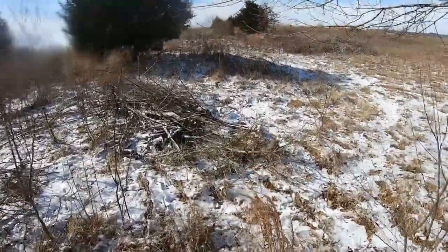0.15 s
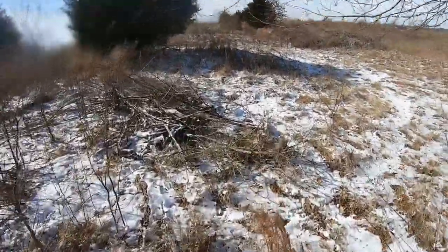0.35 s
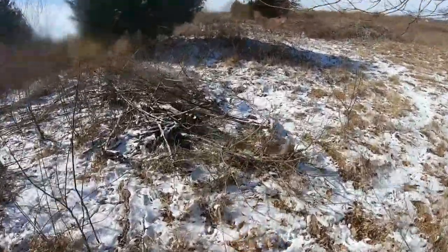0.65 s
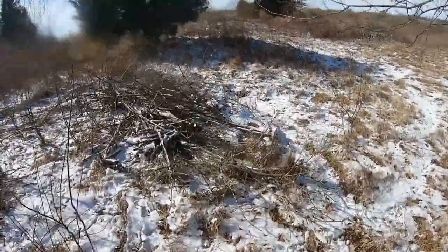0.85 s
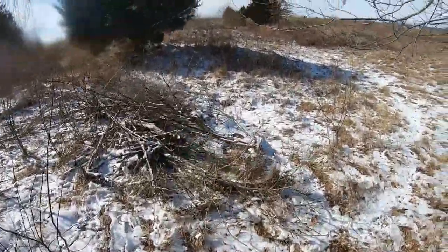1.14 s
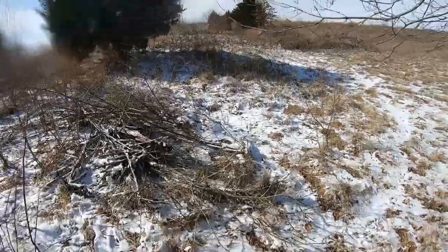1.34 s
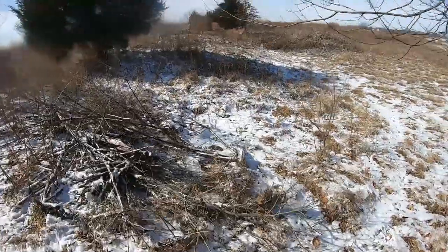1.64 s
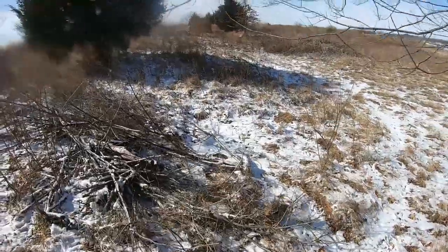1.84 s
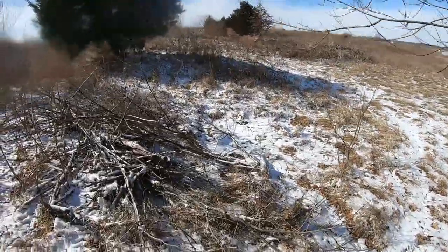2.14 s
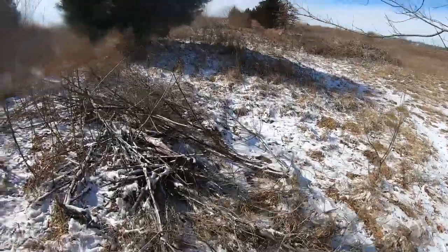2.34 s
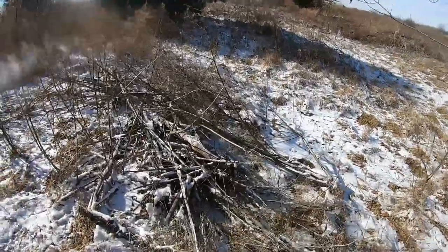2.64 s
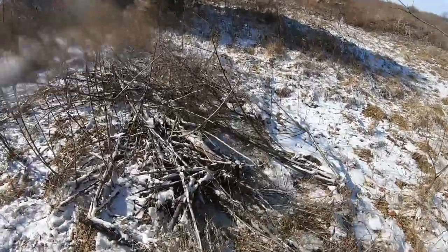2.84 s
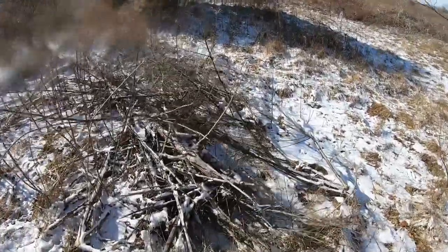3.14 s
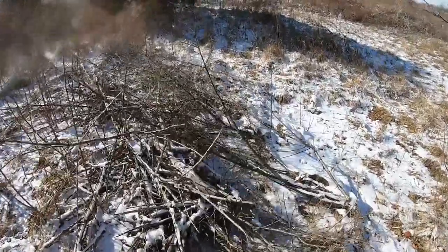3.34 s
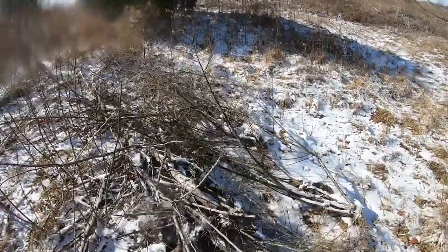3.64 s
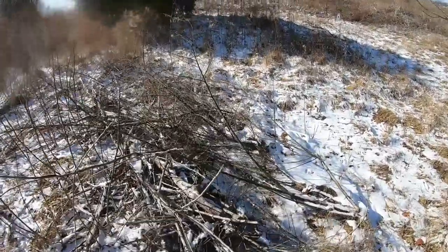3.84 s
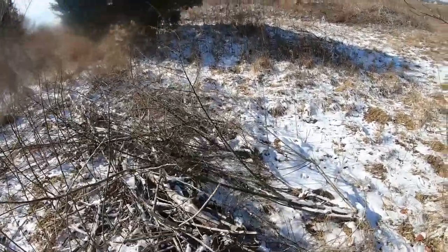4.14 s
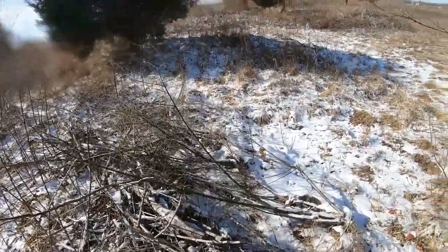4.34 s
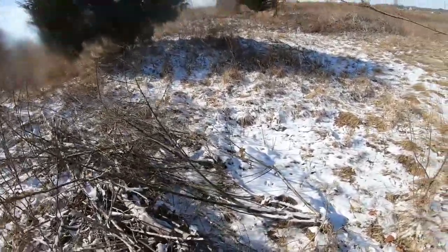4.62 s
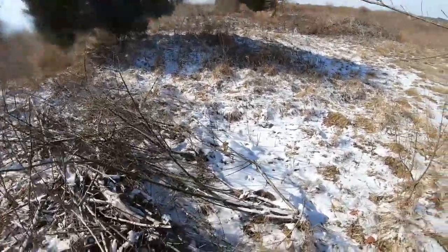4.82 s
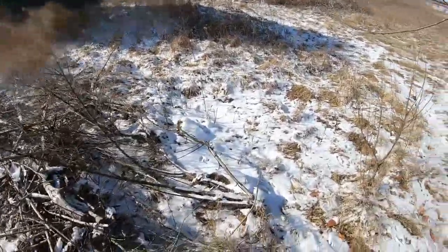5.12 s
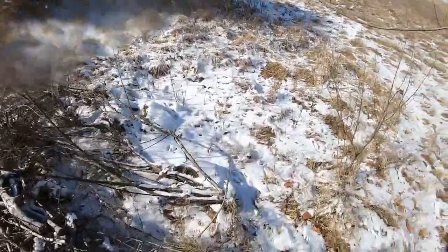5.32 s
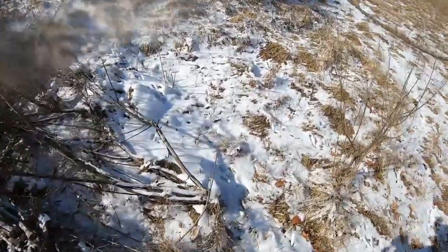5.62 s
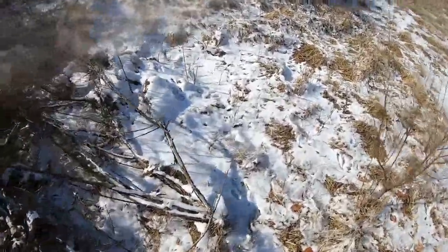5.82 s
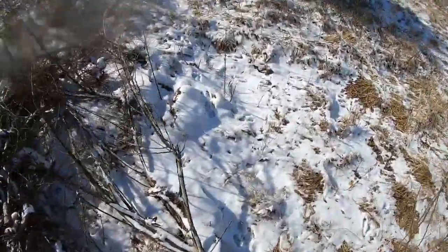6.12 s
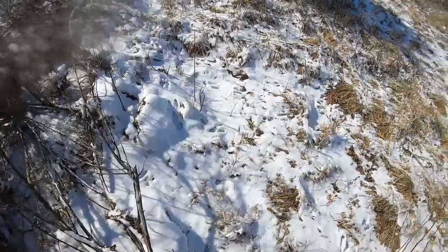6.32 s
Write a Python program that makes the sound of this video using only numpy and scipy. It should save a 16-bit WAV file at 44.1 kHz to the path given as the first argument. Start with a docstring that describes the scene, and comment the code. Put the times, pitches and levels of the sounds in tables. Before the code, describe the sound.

Dry brush crackles and scrapes around a walker's legs as frozen snow gives way underfoot in lumpy crunches with dull thuds. Sharp twigs break throughout, loudest at about three and a half seconds. After a near pause, a faint squeak and heavy low wind buffets come in, then busy crunching and snapping continue. Outdoor, dry, no echo, heard from a small body-worn camera, early stereo width soon collapsing to the middle.

```python
"""Boots crush crusted snow and push through dry brush in an open field: lumpy and fine crackling noise.
Twigs snap as sharp pulses with decaying noise, thin tips tick, and stems squeak as gliding tones.
Wind buffets the two ports of a small camera as lumpy low noise, over a faint rush of the far field.
The wide stereo picture soon folds into the middle."""
import sys
import numpy as np
from scipy import signal
from scipy.fft import rfft, irfft, next_fast_len
from scipy.io import wavfile
from scipy.ndimage import uniform_filter1d, map_coordinates

SR = 44100
rng = np.random.default_rng(int(sys.argv[2]) if len(sys.argv) > 2 else 0)


def int16_out(signal):
    """Quantize to a 16-bit WAV file."""
    q = np.round(np.clip(np.atleast_2d(signal).T, -1, 1) * 32767)
    wavfile.write(sys.argv[1], SR, q.astype(np.int16))


N = 285309
TIME_S = np.arange(N) / SR

# pushes of a boot or leg: start_s, hold_s, stems_db, crust_db
CRUNCHES = [(0.0, 0.12, -32.5, -33.5), (0.142, 0.1, -29.5, -27), (0.256, 0.14, -29.5, -25.5),
            (0.379, 0.2, -31, -27), (0.592, 0.17, -42.5, -31.5), (0.804, 0.1, -33, -30),
            (0.953, 0.029, -39, -31.5), (1.346, 0.075, -33.5, -31.5), (1.515, 0.16, -29.5, -27.5),
            (1.735, 0.3, -31.5, -25), (2.095, 0.077, -25.5, -21.5), (2.204, 0.041, -36.5, -24),
            (2.415, 0.12, -47, -32.5), (3.028, 0.2, -34.5, -30.5), (3.568, 0.05, -17.5, -23.5),
            (3.655, 0.019, -25, -38.5), (3.798, 0.021, -36.5, -37), (4.35, 0.18, -58, -48.5),
            (4.548, 0.14, -36.5, -34), (4.773, 0.089, -33.5, -30), (4.882, 0.076, -33.5, -29),
            (5.02, 0.14, -30.5, -30), (5.229, 0.12, -29, -25.5), (5.53, 0.32, -38, -28),
            (5.717, 0.16, -28.5, -29), (5.943, 0.045, -25.5, -29), (6.046, 0.21, -33.5, -32.5),
            (6.268, 0.4, -36, -30)]
ATTACK_SHARE, SAG_DB_PER_S, RELEASE_DB_PER_S = 0.23, 9, 263
SETTLE_DB, SETTLE_DB_PER_S = -11, 70  # loose crumbs and stems settle after a push


def pushes(levels_db):
    """Each push swells over part of its hold, sags, lets go fast and settles slowly; powers add."""
    t = np.arange(SR // 2) / SR
    power = np.zeros(N + SR)
    for (start_s, hold_s, *_), level_db in zip(CRUNCHES, levels_db):
        after_s = np.maximum(t - hold_s, 0)
        release = amp(-2 * RELEASE_DB_PER_S * after_s)
        settling = amp(2 * (SETTLE_DB - SETTLE_DB_PER_S * after_s))
        attack = np.minimum(t / (ATTACK_SHARE * hold_s), 1)
        swell = amp(level_db - SAG_DB_PER_S * np.minimum(t, hold_s)) * attack
        power[round(start_s * SR):][:len(t)] += swell ** 2 * (release + settling)
    return np.sqrt(power[:N])


# breaking twigs and crust: start_s, stems_db, thud_db, t60_s
SNAPS = [(0.043, -15, -24, 0.024), (0.275, -23, -54, 0.14), (.3, -29, -11, 0.015), (0.335, -23, -44, 0.098),
         (0.436, -20, -25, 0.026), (0.4666, -20.5, -54, 0.032), (0.5806, -14.5, -35, 0.0072),
         (0.6524, -14.5, -10, 0.0033), (0.761, -16, -18, 0.012), (0.8181, -22, -27, 0.044),
         (1.348, -40, -26, 0.023), (1.363, -43, -11, 0.014), (1.578, -23, -5, 0.027),
         (1.761, -25, -23, 0.04), (1.819, -20, -40, 0.029), (1.853, -66, -14, 0.015),
         (1.883, -50, -9.5, 0.012), (2.069, -40, -19.5, 0.11), (2.088, -40, -14.5, 0.064),
         (2.119, -29, -19, 0.085), (2.162, -33, -18, 0.027), (2.233, -45, -19, 0.033),
         (2.488, -34, -44, 0.04), (2.584, -26.5, -35, 0.024), (2.887, -39, -32.5, 0.082),
         (2.9907, -27, -29.5, 0.051), (3.035, -20, -43, 0.032), (3.0969, -7.5, -20.5, 0.048),
         (3.2159, -5, 3, 0.0062), (3.265, -24.5, -31, 0.038), (3.453, -39, -21, 0.048),
         (3.475, -37, -33, 0.27), (3.5355, -9.5, -14.5, 0.04), (3.5541, -8, -13, 0.052),
         (3.5623, -4.5, -4, 0.012), (3.582, -8, -4, 0.0068), (3.6486, -8, -42, 0.025),
         (4.291, -71, -45, 0.025), (4.467, -32, -30, 0.11), (4.604, -20.5, -39, 0.061),
         (4.655, -27, -37, 0.043), (4.719, -48, -21, 0.016), (5.058, -45, -18.5, 0.044),
         (5.079, -16, -26, 0.019), (5.1873, -22, -31, 0.035), (5.254, -19.5, -12.5, 0.057),
         (5.467, -22, -25.5, 0.085), (5.6105, -13, -24, 0.024), (5.665, -25.5, -40, 0.06),
         (5.9278, -15, -26, 0.051), (5.9716, -6, -14.5, 0.015), (5.98, -10, -20.5, 0.083),
         (6.087, -30, -27.5, 0.04), (6.21, -20.5, -68, 0.067), (6.296, -28, -20, 0.016),
         (6.393, -22, -44, 0.022)]
# slow changes of colour, including the change of the camera's stereo mode near 0.8 s:
# time_s, tips_over_stems_db, deep_over_crust_db, hollow_centre_hz
COLOUR_DRIFT = [(0, 2.5, -2.5, 454), (.75, 3, -2, 475), (.85, -5, -4, 408), (1.3, -12.5, 3.5, 365),
                (2.1, -6.5, 2, 411), (2.9, -13.5, -3.5, 330), (3.7, -12.5, -1, 360), (4.5, -16, 9, 412),
                (5, -13.5, -2.5, 516), (6.47, -10.5, -28, 688)]
# colour of the breaking crust: freq_hz, relative_db
CRUST_COLOUR = [(250, -23), (420, -2.5), (930, -6), (2500, -15), (3300, -49.5)]
# colour of the snow packed below: freq_hz, relative_db
DEEP_COLOUR = [(100, -39), (170, 0.5), (330, -3), (520, -18), (900, -58)]
CRUST_REST_DB = -43.5  # faint stirring between pushes


def crust():
    """Frozen crust gives way in coarse lumps, packs the snow below and thuds under each snap."""
    start_s, _, thud_db, t60_s = np.transpose(SNAPS)
    _, deep_db, hollow_centre_hz = curves(COLOUR_DRIFT)
    lumps = unit(1.0 + crackle(rate_hz=89, spread_db=3.5, t60_s=0.031))
    crush = np.hypot(pushes(np.transpose(CRUNCHES)[3]), amp(CRUST_REST_DB)) * lumps
    thud = snap_envelope(start_s, thud_db, 1.03 * t60_s)

    upper_noise = patchy(ports(0.53, left_db=-14.0), depth_db=2.0)
    upper = coloured((crush + amp(-2) * thud) * upper_noise, CRUST_COLOUR)
    lower_env = amp(deep_db) * (crush + amp(-0.5) * thud)
    lower = coloured(lower_env * ports(1.0, left_db=0.0), DEEP_COLOUR)

    # the hollow under the crust rings unsteadily, at a new random pitch for each snap
    latest = np.maximum(np.searchsorted(start_s, TIME_S) - 1, 0)
    detune = np.exp(rng.normal(0, 0.18, len(start_s)))
    hollow_hz = hollow_centre_hz[np.round(start_s * SR).astype(int)] * detune
    phase = 2 * np.pi * hollow_hz[latest] * (TIME_S - start_s[latest])
    ring = np.sin(phase + 1.2 * wobble(160))
    lowpass = signal.butter(2, 1200, fs=SR, output="sos")
    return upper + lower + amp(9.0) * signal.sosfilt(lowpass, thud * ring)


# colour of the stems as the camera's microphones hear them: freq_hz, relative_db
HEARD_STEMS_COLOUR = [(600, -37), (1200, -4.5), (2200, -3), (3100, 0.5), (4300, -4.5), (5000, -11.5),
                      (5400, -35), (7000, -40.5)]
# colour of the thin tips as the camera's microphones hear them: freq_hz, relative_db
HEARD_TIPS_COLOUR = [(3500, -4), (5500, 0), (7400, 1.5), (10900, -5.5), (12000, -15.5), (14000, -18.5),
                     (16000, -45)]
# thin dry tips flick back: start_s, level_db
TICKS = [(2.3212, -13), (2.832, -35), (3.307, -35), (4.468, -19)]
TICK_T60_S = 0.0075
STEMS_REST_DB = -47.5  # faint stirring between pushes
SNAP_TIPS_DB = -0.5  # snaps shake the tips slightly less than rubbing does
CRACK_DB = 7.5  # one-sample pulse of the break, over the snap's stems level


def brush():
    """Stems rub and break in grains, louder on the right; the same grains drive their bright tips."""
    start_s, stems_db, _, t60_s = np.transpose(SNAPS)
    grains = unit(.9 + crackle(rate_hz=300, spread_db=3, t60_s=0.02))
    rub = np.hypot(pushes(np.transpose(CRUNCHES)[2]) * grains, amp(STEMS_REST_DB))
    snaps = snap_envelope(start_s, stems_db, t60_s)
    crack = np.bincount(np.round(start_s * SR).astype(int), amp(stems_db + CRACK_DB), N)
    crack = crack * amp([[-4], [4]])  # left, right

    stem_noise = patchy(ports(0.28, left_db=-5.5), depth_db=2.0)
    stems = coloured(crack + (rub + snaps) * stem_noise, HEARD_STEMS_COLOUR)

    ticks = snap_envelope(*np.transpose(TICKS), TICK_T60_S)
    tips_env = amp(curves(COLOUR_DRIFT)[0]) * (rub + amp(SNAP_TIPS_DB) * snaps) + ticks
    tip_noise = patchy(ports(-0.52, left_db=-4.5), depth_db=3.0)
    return stems + coloured(tips_env * tip_noise, HEARD_TIPS_COLOUR)


# a stem slides on cloth: start_s, length_s, from_hz, to_hz, level_db (before flutter)
SQUEAKS = [(4.48, 0.079, 974, 1210, -33.5), (6.252, 0.057, 5350, 4800, -39)]


def squeaks():
    """Stick and slip of a sliding stem: a gliding tone with random phase and level flutter."""
    out = np.zeros(N)
    flutter = amp(4 * wobble(150))
    for start_s, length_s, from_hz, to_hz, level_db in SQUEAKS:
        u = np.linspace(0, 1, round(length_s * SR))
        phase = 2 * np.pi * np.cumsum(from_hz + (to_hz - from_hz) * u ** 2) / SR
        tone = np.sin(phase + 2 * wobble(318)[:len(u)])
        fade = np.sqrt(np.sin(np.pi * u).clip(0))
        out[round(start_s * SR):][:len(u)] += amp(level_db) * fade * tone
    return out * flutter


# wind buffets: time_s, level_db
WIND = [(0.0, -33.5), (0.45, -26), (0.5, -16.5), (1.22, -39), (2.18, -21), (2.41, -41.5), (2.62, -33),
        (2.96, -29), (3.5, -27), (3.71, -44.5), (3.98, -28.5), (4.16, -51), (4.32, -21.5), (4.48, -38),
        (4.51, -8.5), (5.17, -27.5), (5.35, -8.5), (5.4, -21), (5.93, -13), (5.98, -22)]
# balance of the buffets: time_s, left_over_right_db
WIND_SIDE = [(0, -1), (.38, -8), (.5, 16)]
# colour of the buffets: freq_hz, relative_db
RUMBLE_COLOUR = [(15, 3), (42, 6.5), (169, -1.5), (291, -15), (600, -24.5), (1300, -89)]
# colour of the far field: freq_hz, relative_db
FIELD_COLOUR = [(40, 0), (150, -15), (300, 5), (1000, -6), (4300, -7), (5300, -35), (11000, -14.5),
                (16000, -56)]


def wind():
    """Eddies buffet the ports in lumps, as nearly unrelated noises; the far field rushes faintly."""
    lumps = unit(amp(4 * wobble(22)))
    swell = amp(2.5 * wobble(4))
    rumble = coloured(ports(0.043, left_db=curves(WIND_SIDE)[0]), RUMBLE_COLOUR)
    buffet = amp(curves(WIND)[0]) * lumps * rumble
    return buffet + amp(-51.5) * swell * coloured(ports(0.3, left_db=6), FIELD_COLOUR)


def snap_envelope(starts_s, levels_db, t60s_s):
    """Sum of sudden starts, each with its own exponential decay."""
    t = np.arange(SR // 4) / SR
    rise = 1 - np.exp(-t / 0.00075)
    env = np.zeros(N + SR)
    for start_s, level_db, t60_s in np.broadcast(starts_s, levels_db, t60s_s):
        env[round(start_s * SR):][:len(t)] += amp(level_db - 60 * t / t60_s) * rise
    return env[:N]


def crackle(rate_hz, spread_db, t60_s):
    """Envelope, at rms 1, of small breaks at random moments with exponentially spread dB sizes."""
    chance, size = rng.random((2, N))
    size_db = np.minimum(-spread_db * np.log(1 - size), 3 * spread_db)
    kicks = (chance < rate_hz / SR) * amp(size_db)
    return unit(np.sqrt(dying(kicks ** 2, t60_s / 2)))  # half the t60, as this is power


def dying(kicks, t60_s):
    """Each kick starts at once and decays exponentially."""
    return signal.lfilter([1], [1, -amp(-60 / (t60_s * SR))], kicks)


def patchy(pair, depth_db):
    """Random gain in small patches of time and frequency, the same at both ports."""
    z = signal.stft(pair, nperseg=512)[2]
    field = uniform_filter1d(rng.standard_normal(z.shape[1:]), size=3, axis=0)
    field = uniform_filter1d(field, size=3, axis=1)
    gain = unit(amp(depth_db * unit(field)))
    return signal.istft(z * gain, nperseg=512)[1][:, :N]


def ports(alike, left_db):
    """Noise at two ports with correlation alike and left-over-right left_db; their mean has rms 1."""
    shared, other = rng.standard_normal((2, N))
    left = amp(left_db / 2) * (alike * shared + np.sqrt(1 - alike ** 2) * other)
    right = amp(-left_db / 2) * shared
    return np.array([left, right]) / np.std((left + right) / 2)


def coloured(x, spectrum):
    """Filter x by a colour at unit energy, so white noise keeps its power."""
    pulse = pulse_of(spectrum)
    pulse = pulse / np.linalg.norm(pulse)
    return signal.fftconvolve(x, pulse[None], axes=1)[:, :N]


def pulse_of(spectrum):
    """Minimum-phase pulse of a colour, by folding its cepstrum."""
    size = 4096
    freq_hz, db = np.transpose(spectrum)
    bins_hz = np.fft.rfftfreq(size, 1 / SR)
    gain = amp(np.interp(np.log(bins_hz + 1), np.log(freq_hz + 1), db, left=-70))
    ceps = irfft(np.log(gain + 1e-6))
    ceps[1:size // 2] *= 2
    ceps[size // 2 + 1:] = 0
    return irfft(np.exp(rfft(ceps)))


def wobble(rate_hz):
    """Smooth random curve with rate_hz knots a second."""
    knots = rng.standard_normal(int(N * rate_hz / SR) + 4)
    return map_coordinates(knots, [np.arange(N) * rate_hz / SR])


def curves(rows):
    """One value per sample for each column after the time."""
    time_s, *columns = np.transpose(rows)
    return [np.interp(TIME_S, time_s, column) for column in columns]


def amp(db):
    """Gain of a level in dB."""
    return 10 ** (np.asarray(db) / 20)


def unit(x):
    """x at rms 1."""
    return x / np.sqrt(np.mean(x ** 2) + 1e-20)


def scene():
    """All sources at the two ports."""
    return crust() + brush() + squeaks() + wind()


# share of the wide mode: time_s, wide_share_db
WIDTH = [(0, -1), (.8, -3), (1.05, -17), (1.4, -41), (1.9, -75)]
TOP_HZ = 16180


def record(dry):
    """Wide mode fades to a centred one with only treble at the sides; peaks round off, band limit."""
    wide = amp(curves(WIDTH)[0])
    mid, side = (dry[0] + dry[1]) / 2, (dry[0] - dry[1]) / 2
    top = signal.sosfilt(signal.butter(24, 11500, "high", fs=SR, output="sos"), side)
    treble = signal.sosfilt(signal.butter(6, 4500, "high", fs=SR, output="sos"), side)
    narrow_side = amp(-5) * top + amp(-31.0) * treble
    centred = np.array([mid + narrow_side, mid - narrow_side])
    pair = wide * dry + (1 - wide) * centred
    pair = .96 * pair / (1 + np.abs(pair) ** 6) ** (1 / 6)
    size = next_fast_len(N + SR)
    passed = np.fft.rfftfreq(size, 1 / SR) < TOP_HZ
    return irfft(rfft(pair, size) * passed, size)[:, :N]


dry = scene()
out = record(dry)
int16_out(out)
```